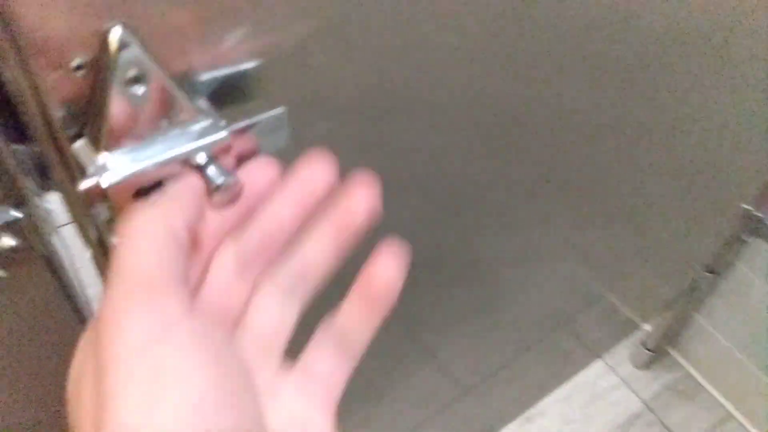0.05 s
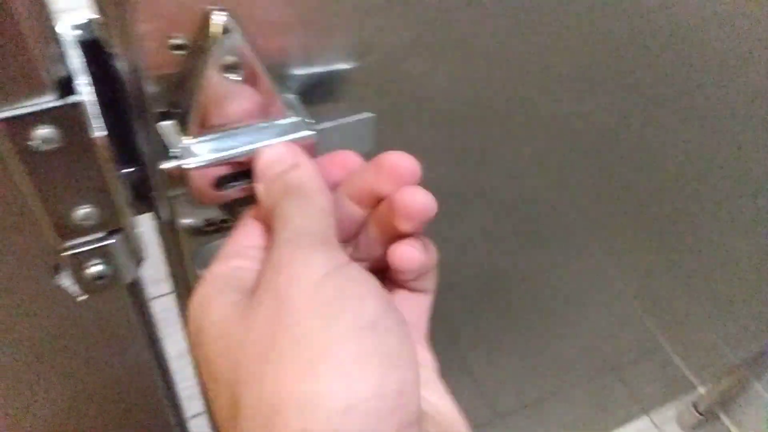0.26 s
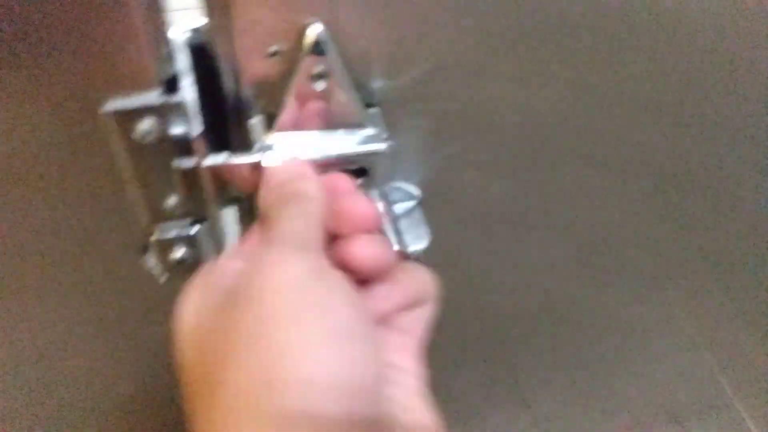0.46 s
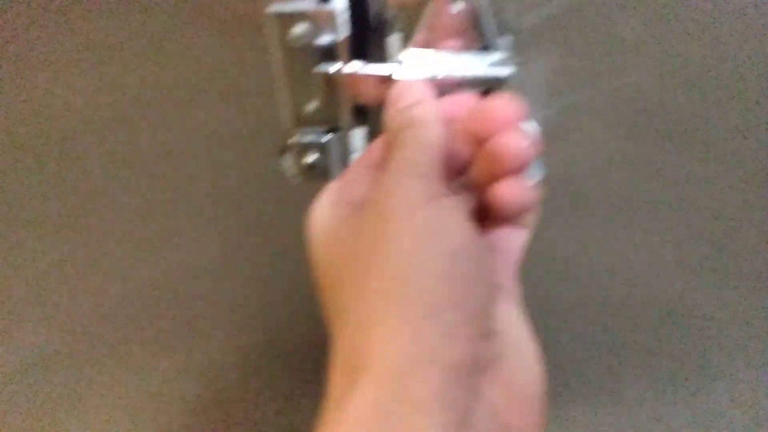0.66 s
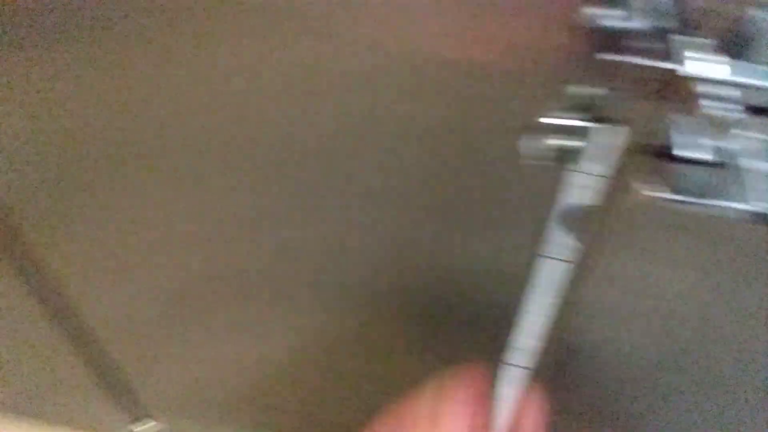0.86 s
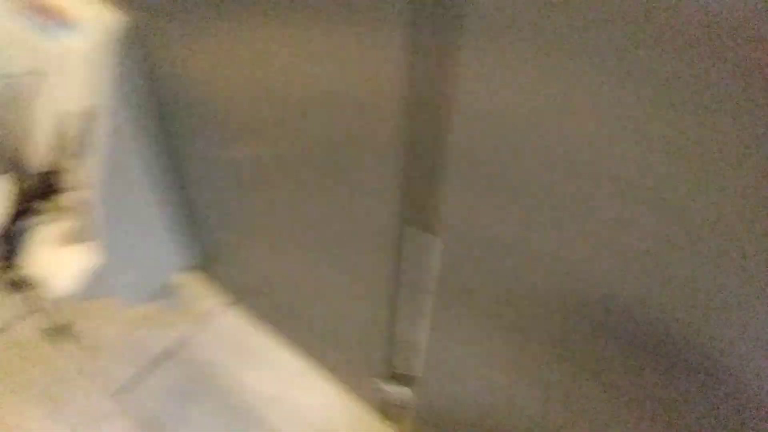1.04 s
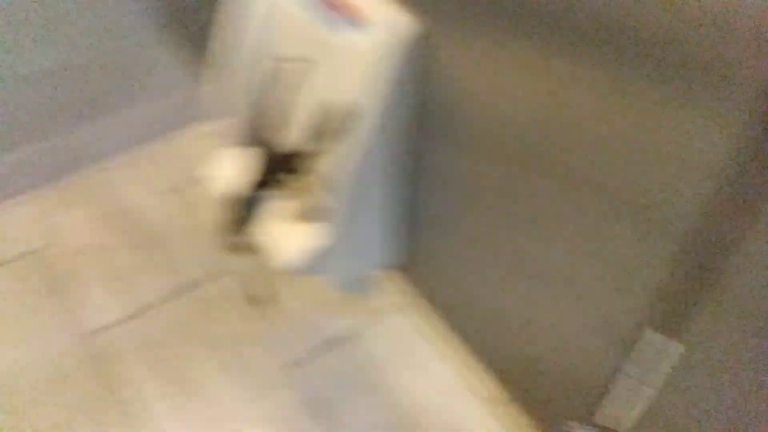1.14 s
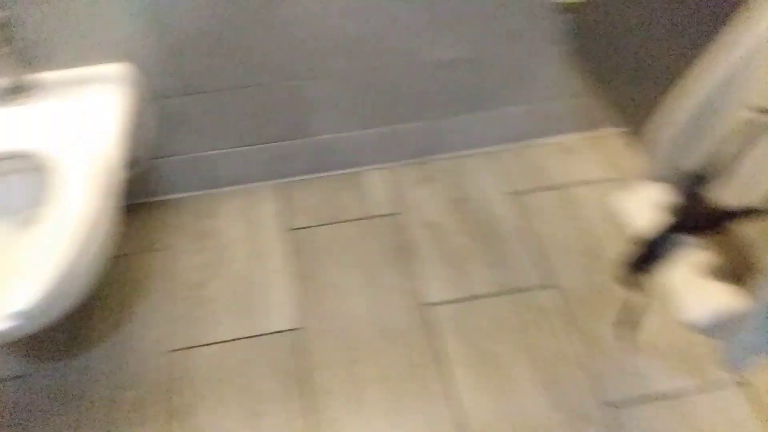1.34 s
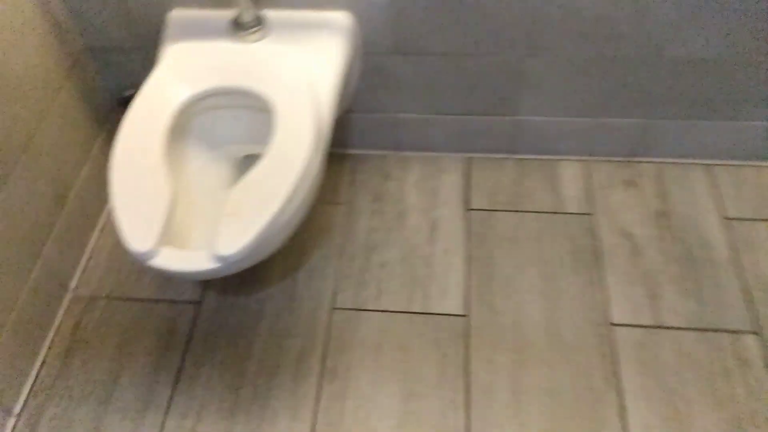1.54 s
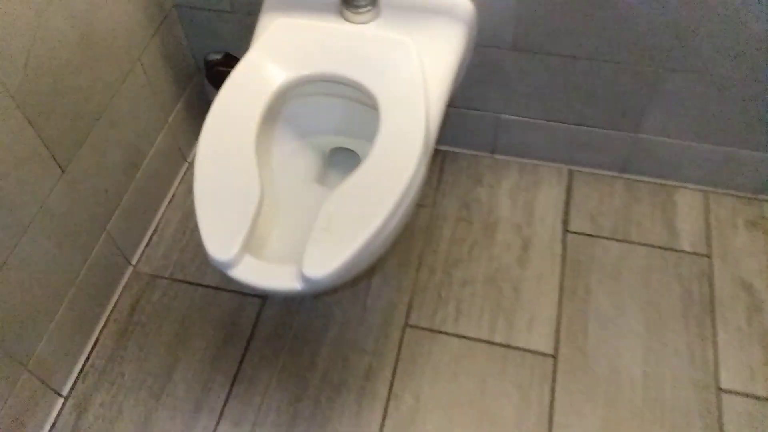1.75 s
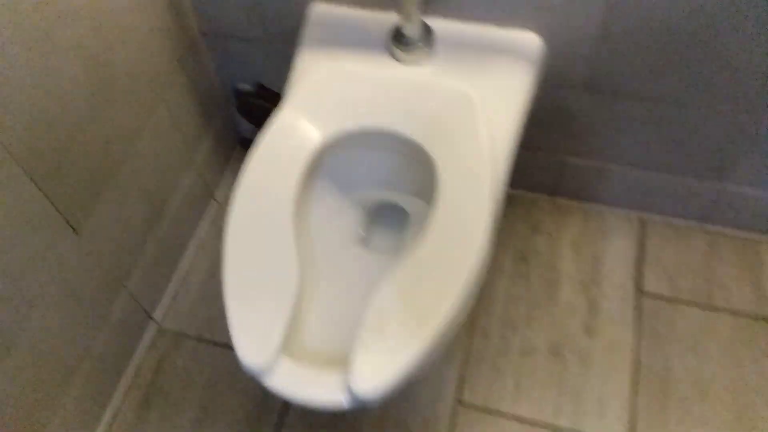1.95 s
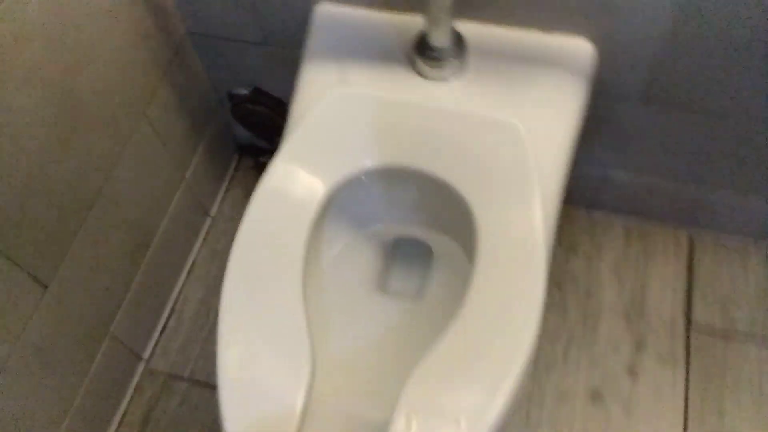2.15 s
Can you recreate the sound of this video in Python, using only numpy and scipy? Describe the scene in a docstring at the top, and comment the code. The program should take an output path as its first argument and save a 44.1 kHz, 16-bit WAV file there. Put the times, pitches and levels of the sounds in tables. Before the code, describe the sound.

A steel stall door bumps shut close by at about 0.2 seconds, after a faint hinge squeak, with a hollow boom and a sharp latch clack. The bolt scrapes along around 0.4 seconds and clacks into its stop at 0.55. The blows echo through the tiled restroom for about a second. From 1.3 to 2 seconds, a few soft steps scuff and a sleeve rustles faintly over quiet ventilation.

```python
"""Ventilation drones in a tiled restroom, a hinge squeaks faintly, and a steel stall door bumps shut
close to a two-port microphone. The hollow panel booms in its low modes, the latch clacks against its
keeper, and the bolt scrapes along and clacks into its stop. The tiles sustain each blow as
reverberation; then a few soft steps scuff the floor and a sleeve rustles."""
import sys
import numpy as np
from scipy import signal
from scipy.fft import rfft, irfft
from scipy.io import wavfile
from scipy.ndimage import uniform_filter1d

SR = 44100
rng = np.random.default_rng(int(sys.argv[2]) if len(sys.argv) > 2 else 0)


def waveform_to_disk(signal):
    """Save audio, clipped to [-1, 1], as 16-bit WAV at the path in sys.argv[1]."""
    frames = np.transpose(np.atleast_2d(signal))
    scaled = np.clip(frames, -1, 1) * 32767
    samples = np.round(scaled).astype(np.int16)
    wavfile.write(sys.argv[1], SR, samples)


N = 97020
CLANG_RISE_S = 0.004  # build-up of the reverberation of latch and bolt


def amp(db):
    """Amplitude ratio of a level in decibels."""
    return 10 ** (np.asarray(db) / 20)


def unit(x):
    """Normalisation to rms 1."""
    return x / np.sqrt(np.mean(x ** 2) + 1e-20)


def clock():
    """Sample times in seconds."""
    return np.arange(N) / SR


def bins():
    """Fourier frequencies of a full-length signal."""
    return np.fft.rfftfreq(N, 1 / SR)


def read(points, hz):
    """Interpolation on a log-frequency axis."""
    f, value = np.transpose(points)
    return np.interp(np.log(hz + 1), np.log(f + 1), value)


def at(s, sound):
    """Pure delay of s seconds."""
    silence = np.zeros(sound.shape[:-1] + (round(s * SR),))
    return np.concatenate([silence, sound], -1)[..., :N]


def resonance(hz, width):
    """Lorentzian peak of a damped resonator."""
    return 1 / (1 + (2 * (bins() - hz) / width) ** 2)


def ring(modes, scatter=0):
    """Free vibration: a sum of damped modes, their phases spread over scatter cycles."""
    t = clock()
    return sum(amp(db - 60 * t / t60) * np.cos(2 * np.pi * (hz * t + scatter * rng.random()))
               for hz, db, t60 in modes)


def diffuse(gain):
    """Diffuse field: noise of rms 1 from all sides, alike at both ports only for long waves."""
    # likeness of the ports (frequency [Hz], correlation [-])
    correlation = [(50, 0.84), (130, 0.98), (280, 0.9), (550, .72), (1100, -0.0087), (2200, -0.11),
                   (5000, -0.029), (13000, .15)]
    # left over right (frequency [Hz], level difference [dB])
    balance = [(100, 1), (350, 0.5), (1200, -1.5), (2000, -5), (4000, -4.5), (8000, -2), (14000, -1.5)]
    common, separate = rfft(rng.standard_normal((2, N)))
    same = np.clip(read(correlation, bins()), -1, 1)
    lean = amp(read(balance, bins()) / 2)
    left = common * lean
    right = (same * common + np.sqrt(1 - same ** 2) * separate) / lean
    return unit(irfft(np.array([left, right]) * gain, N))


def room(gain, rise_s, bands=12, early_db=2, early_s=0.028, early_spread_s=0.017):
    """Reverberation: sound builds up, early reflections crowd in, each band dies at its own rate."""
    # decay of the tiled room (frequency [Hz], t60 [s])
    decay = [(40, 1.65), (120, 1.76), (250, 1.28), (500, 1.29), (1000, 1.45), (2000, 1.2247), (4000, 1.15),
             (6000, 1), (8000, 0.19), (12000, 1.07), (16000, 0.3)]
    t, centres = clock(), np.geomspace(40, 16000, bands)
    spectrum = rfft(diffuse(gain))
    tail = 0
    for hz, weights in zip(centres, np.eye(bands)):
        band = irfft(spectrum * read(np.c_[centres, weights], bins()), N)
        tail += band * amp(-60 * t / read(decay, hz))
    early = amp(early_db * np.exp(-((t - early_s) / early_spread_s) ** 2))
    return tail * (1 - np.exp(-t / rise_s)) * early


def ventilation():
    """Broadband flow noise and two duct resonances, drifting in level."""
    # rushing air (frequency [Hz], relative density [dB])
    air_spectrum = [(20, -12), (45, 4), (85, -8), (150, -0.5), (270, -8), (600, -10), (1500, -14),
                    (3000, -21), (6000, -33.5), (10000, -36), (16000, -37)]
    # its envelope (time [s], level [dB])
    air_level = [(0, -54.5), (.22, -52.5), (1, -50.5), (1.6, -53.5), (1.741, -55.5), (1.85, -57),
                 (1.95, -51), (2.2, -49.5)]
    # duct resonances (frequency [Hz], width [Hz], level [dB])
    duct = [(141.6, 16, -53), (184.5, 30, -56)]
    # their drift (time [s], gain [dB])
    drift = [(0, 1.5), (1.1, 1), (1.65, 1), (1.76, -3.5), (2.2, -3.5)]
    air = diffuse(amp(read(air_spectrum, bins()))) * amp(np.interp(clock(), *np.transpose(air_level)))
    drone = sum(amp(db) * diffuse(resonance(hz, width)) for hz, width, db in duct)
    return air + drone * amp(np.interp(clock(), *np.transpose(drift)))


def sleeve():
    """Friction noise of moving cloth, in faint, airy swells."""
    # swells (time [s], half length [s], level [dB])
    rustles = [(0.067, 0.086, -70.5), (1.413, 0.031, -75.5), (1.765, 0.16, -73.5), (2.04, 0.043, -66)]
    # cloth hiss (frequency [Hz], relative density [dB])
    spectrum = [(1000, -28), (7000, -15.5), (10500, -11), (12800, 0.5), (14000, -12), (16000, -15.5)]
    swells = sum(amp(db) * np.exp(-((clock() - s) / half) ** 2) for s, half, db in rustles)
    return diffuse(amp(read(spectrum, bins()))) * swells


def hinge():
    """Damped modes: a faint squeak dies away as the door swings."""
    # squeak partials (frequency [Hz], level [dB], t60 [s])
    modes = [(415, -63, 1.2), (1210, -65.5, 1.3), (1710, -62.5, 1.3)]
    return ring(modes, scatter=0.8)


def steps(tap_db=0.5, tap_decay_s=0.0052):
    """Direct and reverberant sound of shoes on tile: a brief tap, then the room."""
    # steps, scuffs and sole squeaks
    # (time [s], level [dB], centre [Hz], width [octaves], rise [s], fade [s], hiss [dB])
    contacts = [(.148, -54.5, 1300, .5, 0.0022, 0.049, -21.5),
                (1.255, -48.5, 260.2, .5, 0.0034, 0.059, -22), (1.501, -58, 935, 0.042, 0.014, .12, -42),
                (1.874, -57.5, 764, 0.41, .001, 0.066, -12.5), (1.874, -54, 2310, 0.29, 0.008, 0.4, -10),
                (1.994, -50.5, 348, 0.26, 0.0011, 0.14, -24.5), (1.994, -49, 1400, 0.55, .001, 0.14, -24.5),
                (2.017, -50.5, 1870, 0.62, 0.0034, 0.21, -13)]
    t, f, sound = clock(), bins(), 0
    for s, db, hz, octaves, rise_s, fade_s, hiss_db in contacts:
        peak = np.exp(-0.5 * (np.log2((f + 1) / hz) / octaves) ** 2)
        colour = peak + amp(hiss_db) * f * hz / (f ** 2 + hz ** 2)
        tap = amp(tap_db) * diffuse(colour) * np.exp(-t / tap_decay_s)
        tail = room(colour, rise_s) * np.exp(-t / fade_s)
        sound += at(s, amp(db) * (tap + tail))
    return sound


def bolt(middle_s=0.422, half_s=0.053, level_db=-32, room_db=3.5, roughness=0.4):
    """Sliding friction: the bolt rubs through its guide in one grainy stroke, which reverberates."""
    grain = np.exp(roughness * unit(uniform_filter1d(rng.standard_normal(N), 60)))
    stroke = np.exp(-((clock() - middle_s) / half_s) ** 2)
    # scraping steel (frequency [Hz], relative density [dB])
    scrape = [(100, -15), (500, 5), (2000, 7), (4500, 1), (8000, -6), (13000, -6), (16000, -5)]
    rub = amp(level_db) * unit(diffuse(amp(read(scrape, bins()))) * grain) * stroke
    response = room(1, CLANG_RISE_S)
    response /= np.linalg.norm(response[0])
    return rub + amp(room_db) * signal.fftconvolve(rub[:1], response, axes=1)[:, :N]


def latch(contact_s=0.0012, attack_s=0.0004, crack_db=1.5, steel_db=8.5, sing_db=-1.5,
          port_lag_s=0.0002, right_db=-3):
    """Hard impacts excite high modes of the steel; sound reaches the left port first, then the tiles."""
    # blows (time [s], direct gain [dB], room gain [dB], crack decay [s], keeper [dB], stop [dB])
    blows = [(0.2284, -28, -43.5, 0.0031, -11, -11), (0.2585, -13.5, -24, 0.00044, 4, -20),
             (.5479, -11.5, -25, 0.0015, -25.5, -2.5)]
    # contact noise, direct and reverberant (frequency [Hz], relative density [dB])
    crack_spectrum = [(60, -24.5), (300, 4), (900, 0.5), (2500, -4.5), (5000, -3), (10000, -8), (16000, -8)]
    clang_spectrum = [(50, -20.5), (130, -8.5), (220, 4), (420, 2.5), (1000, -4.5), (1800, -2.5),
                      (2800, -6), (5000, -8), (7000, -11.5), (10000, -7.5), (12500, -10), (16000, -14.5)]
    # modes of the keeper and of the bolt's end stop (frequency [Hz], relative level [dB], t60 [s])
    keeper = [(3040, -18.5, 0.017), (5130, 2, 0.0068), (8240, 0.5, 0.0071), (9400, -8, 0.0087),
              (12050, 2.5, .009), (14800, -1, .009)]
    stop = [(880, -6, 0.019), (1750, -8.5, 0.042), (4490, -2.5, 0.011), (6150, -4.5, .014),
            (7890, -4, 0.017), (9500, -7, 0.011), (11100, -5.5, .014), (12500, -6, .016), (13700, -7, .014),
            (14800, -5, .014)]
    # stop resonances that carry into the room (frequency [Hz], width [Hz], relative level [dB])
    stop_peaks = [(203.9, 50, -9), (917, 54, -14.5), (1690, 150, -9), (1807, 150, -6), (4400, 440, -12),
                  (6067, 250, -14), (8550, 200, -18), (9600, 350, -10), (11037, 60, -17), (12480, 500, -9),
                  (14962, 70, -21.5)]
    stop_colour = sum(amp(db) * unit(resonance(hz, width)) for hz, width, db in stop_peaks)
    t, sound = clock(), 0
    attack = np.minimum(t / attack_s, 1)
    for s, direct_db, room_db, decay_s, keeper_db, stop_db in blows:
        fade = np.exp(-np.maximum(t - contact_s, 0) / decay_s)
        crack = diffuse(amp(read(crack_spectrum, bins()))) * fade
        steel = np.array([amp(keeper_db) * ring(keeper, 1) + amp(stop_db) * ring(stop, 0.92)
                          for port in range(2)])
        left, right = amp(direct_db) * (amp(crack_db) * crack + amp(steel_db) * steel) * attack
        direct = np.array([left, amp(right_db) * at(port_lag_s, right)])
        singing = amp(stop_db + sing_db) * room(stop_colour, CLANG_RISE_S)
        clang = room(amp(read(clang_spectrum, bins())), CLANG_RISE_S)
        sound += at(s, direct + amp(room_db) * (clang + singing))
    return sound


def door(touch_s=0.2268, room_delay_s=0.008, hum_rise_s=0.023, boom_rise_s=0.014, boom_db=-18.5):
    """Forced vibration: soft pulses from the frame drive the panel; the stall hums, the room booms."""
    # impact and rebounds (time [s], impulse level [dB], contact duration [s])
    knocks = [(0.2267, -9, 0.0029), (0.2373, -17.5, 0.0055), (0.315, -14.5, 0.0062), (0.394, -20, 0.013)]
    # panel modes and the stall's standing waves (frequency [Hz], level [dB], t60 [s])
    panel = [(40, -15, 0.22), (72, -16, 0.24), (98.8, -2, 0.099), (170, -5.5, 0.089), (246, -2, 0.022),
             (370, 1, .03)]
    stall = [(117, -19.5, 1.1), (197, -28, 1.1), (211, -25, 1.2), (269, -33, 1.2), (310, -34, 1.4),
             (339, -35, 1.5), (377, -34, 1.3), (492, -33, 1), (526, -26, .9), (587, -27, 1.1),
             (705, -30, 1), (727, -34, 1), (818, -32, 1.1), (1315, -36, 1)]
    # the shaking door's reverberation (frequency [Hz], relative density [dB])
    boom_spectrum = [(25, -8.5), (60, -7.5), (120, -0.5), (200, -2), (350, -1), (440, -10.5), (550, -1.5),
                     (750, -9), (950, -11.5), (1400, -12.5), (2500, -15.5), (4500, -23.5), (9000, -28.5),
                     (16000, -22.5)]
    t, force = clock(), 0
    for s, db, length in knocks:
        pulse = np.sin(np.pi * np.minimum(t / length, 1)) ** 2 * 2 / (length * SR)  # unit sum
        force += at(s, amp(db) * pulse)
    thump = -signal.fftconvolve(ring(panel), force)[:N]
    hum = ring(stall, scatter=1) * (1 - np.exp(-t / hum_rise_s))
    boom = amp(boom_db) * room(amp(read(boom_spectrum, bins())), boom_rise_s)
    return thump + at(touch_s + room_delay_s, hum + boom)


def scene():
    """Superposition of all sources at the two ports."""
    return hinge() + door() + latch() + bolt() + ventilation() + sleeve() + steps()


def record(dry, ceiling=0.77, cutoff_hz=16000):
    """Soft saturation rounds the peaks; a low-pass filter limits the band."""
    lowpass = signal.firwin(511, cutoff_hz, window=("kaiser", 9), fs=SR)
    return signal.oaconvolve(ceiling * np.tanh(dry / ceiling), lowpass[None], "same", axes=1)


dry = scene()
out = record(dry)
waveform_to_disk(out)
```